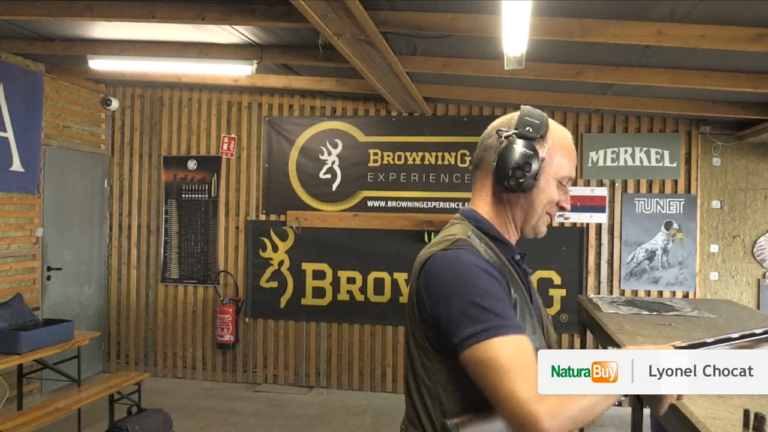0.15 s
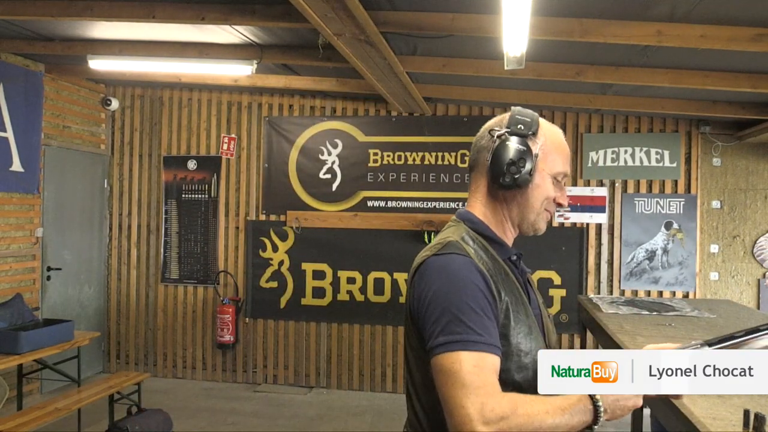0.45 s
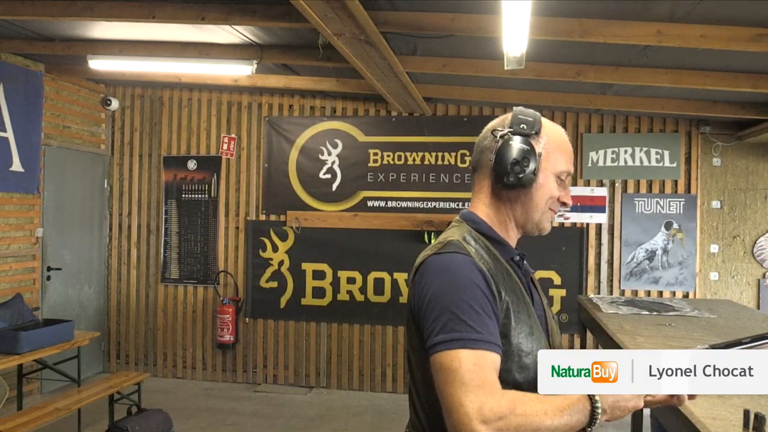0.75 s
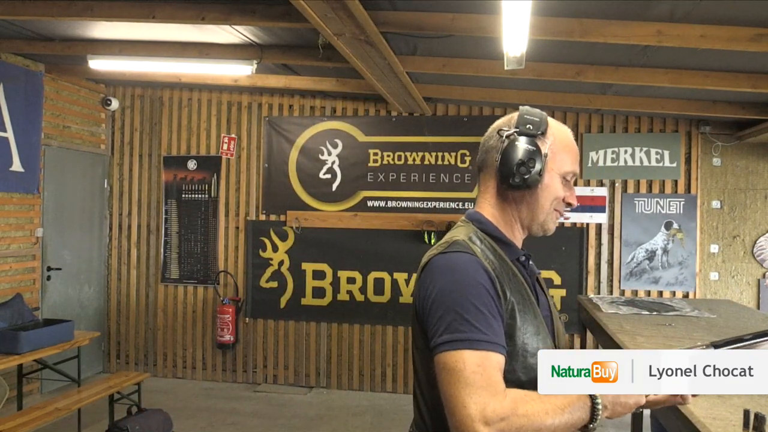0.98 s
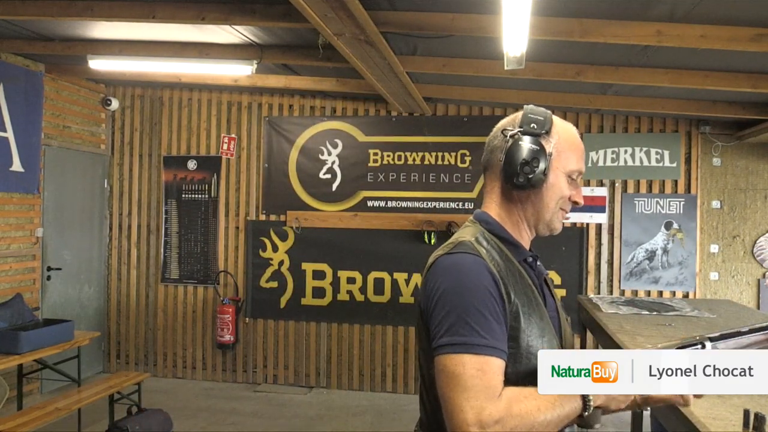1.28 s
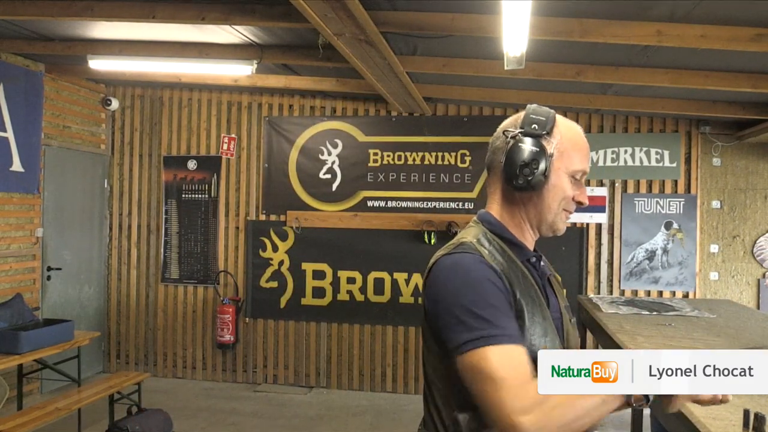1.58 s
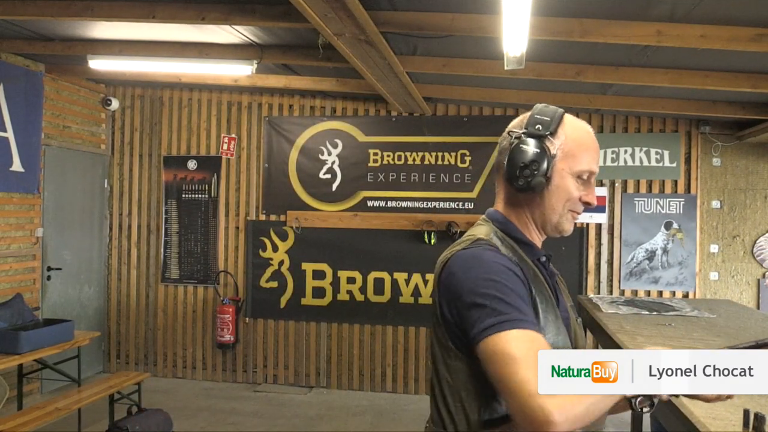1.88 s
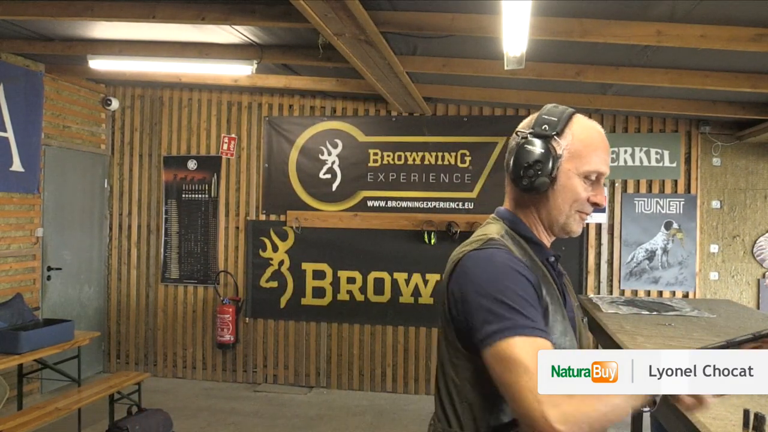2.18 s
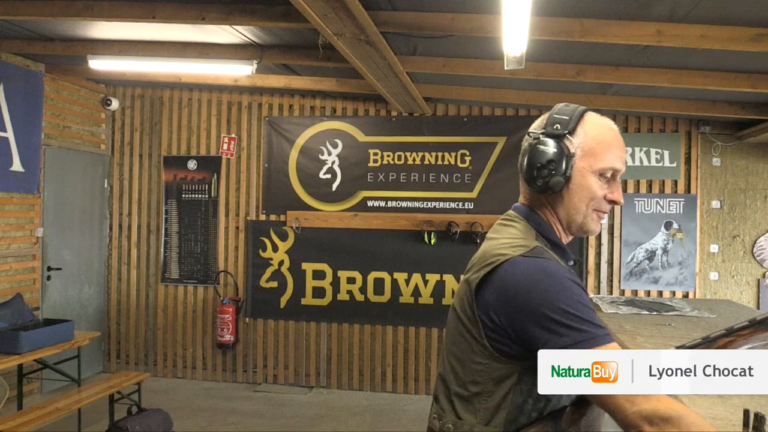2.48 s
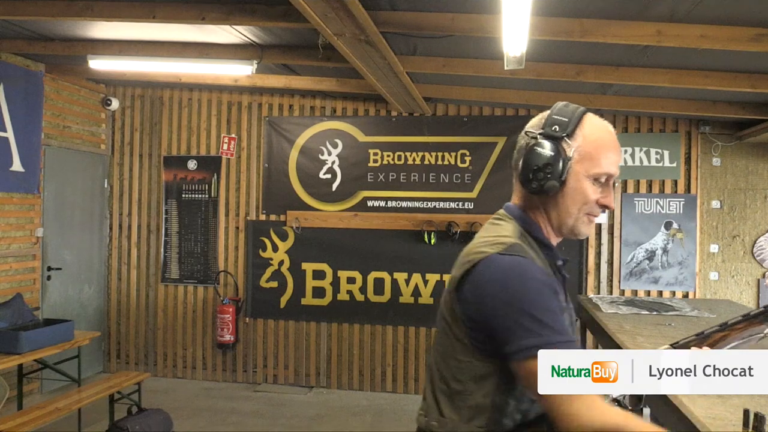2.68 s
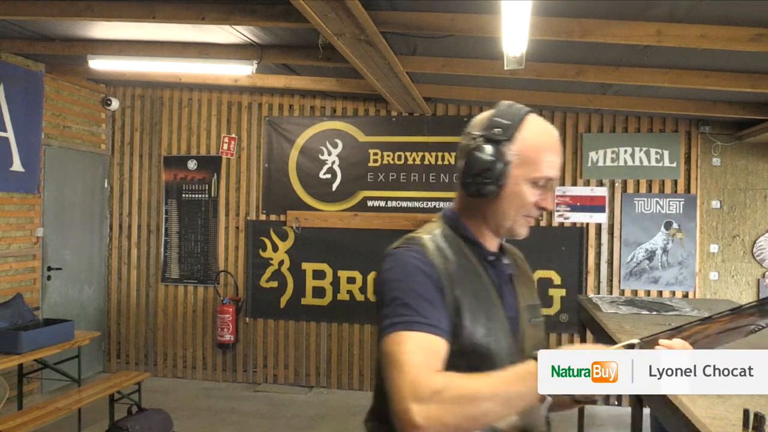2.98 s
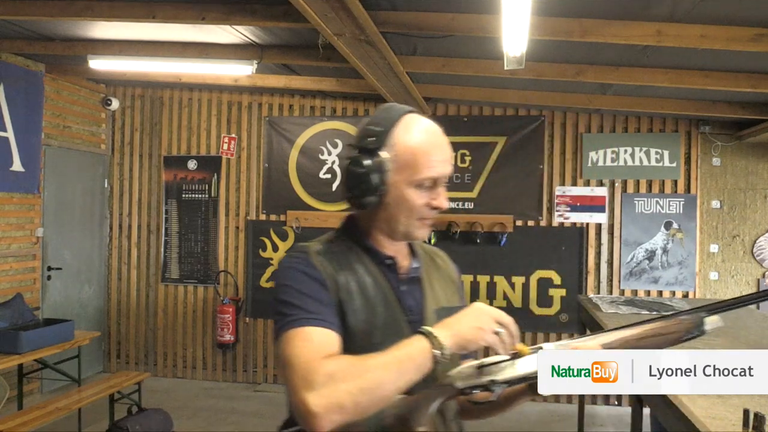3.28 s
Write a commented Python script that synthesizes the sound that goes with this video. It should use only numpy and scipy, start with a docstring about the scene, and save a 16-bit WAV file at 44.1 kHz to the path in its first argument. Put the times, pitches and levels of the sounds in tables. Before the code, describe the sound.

A shotgun action is worked in a wooden indoor range: faint ticks and shell knocks first, then a rapid loud metallic clatter ending in a latch snap, a low thud and small knocks, over quiet ventilation.

```python
"""A shotgun action worked in a wooden indoor range, over uneven ventilation rumble, hiss, faint hums and rustling
clothes. First come small ticks (snaps of band noise) and knocks of hands and shell (noise, pitch, ping, hollow ring).
From 1.85 s a run of steel clacks: chattering contact rings receiver, stock and a bright part; a last latch
ends it at 2.14 s. Then a low thud (resonant noise) with swinging boards (decaying sines), and a few last knocks.
Echoes and a decaying tail answer ticks, knocks and clacks."""
import sys
import numpy as np
from scipy import signal
from scipy.fft import rfft, irfft
from scipy.io import wavfile
from scipy.ndimage import uniform_filter1d

SR = 44100
rng = np.random.default_rng(int(sys.argv[2]) if len(sys.argv) > 2 else 0)


def pcm_store(signal):
    """Save signal as 16-bit PCM."""
    levels = np.round(np.clip(np.atleast_2d(signal), -1, 1) * 32767)
    wavfile.write(sys.argv[1], SR, levels.astype(np.int16).T)


N = 152145


def amp(db):
    """Decibels to amplitude."""
    return 10 ** (np.asarray(db) / 20)


def evened(x):
    """Scale to unit rms."""
    return x / np.sqrt(np.mean(x ** 2) + 1e-20)


def peaked(x):
    """Scale to unit peak."""
    return x / np.max(abs(x))


def read(points, hz):
    """Interpolate a (frequency, value) table over log frequency."""
    f, value = np.transpose(points)
    return np.interp(np.log(hz + 1), np.log(f + 1), value)


def curve(table, column):
    """Interpolate one column of a time table over the whole scene."""
    rows = np.array(table)
    return np.interp(np.arange(N) / SR, rows[:, 0], rows[:, column])


def add(mix, start_s, sound):
    """Mix a sound in at its start time, cut at the end of the scene."""
    part = mix[round(start_s * SR):][:len(sound)]
    part += sound[:len(part)]


def band(x, lo_hz, hi_hz, order=2):
    """Butterworth bandpass."""
    edges = np.clip([lo_hz, hi_hz], 20, .49 * SR)
    return signal.sosfilt(signal.butter(order, edges, "bandpass", fs=SR, output="sos"), x)


def resonate(x, hz, width_hz):
    """Two-pole resonator."""
    r = np.exp(-np.pi * width_hz / SR)
    return signal.lfilter([1 - r], [1, -2 * r * np.cos(2 * np.pi * hz / SR), r * r], x)


def chatter_noise(shape, count=4):
    """Noise under an envelope, spectrum evened out so that no pitch stands out."""
    x = rng.standard_normal(len(shape)) * shape
    for _ in range(count):
        flat = irfft(np.exp(1j * np.angle(rfft(x))), len(x))
        x = np.sign(flat) * shape
    return x


def burst(t60_s, size=4000):
    """Noise that starts at once and dies: the rattle of a contact."""
    t = np.arange(size) / SR
    return chatter_noise(amp(-60 * t / max(t60_s, .002)))


def ring(modes, drive):
    """A drive signal shakes a set of dying sine modes; unit peak."""
    t = np.arange(len(drive)) / SR
    tone = sum(amp(db - 60 * t / t60_s) * np.sin(2 * np.pi * hz * t) for hz, db, t60_s in modes)
    return peaked(signal.fftconvolve(drive, tone)[:len(drive)])


# room bed spectrum, relative: [f/Hz, density/dB per Hz]
BED_SPECTRUM = [(12, -53.5), (20, -10.5), (27, -22.5), (91, 0.5), (107, -14), (123, -22), (216, -25),
                (434, -32), (590, -30), (923, -28.5), (1290, -36), (2990, -41.5), (3840, -38),
                (4300, -48.5), (16000, -47.5)]
# low rumble, randomly uneven: [t/s, rms level/dB]
RUMBLE = [(0.0, -59), (1.13, -54.5), (1.41, -62), (1.53, -57.5), (2.2, -62), (2.36, -65), (2.55, -56.5),
          (3.07, -57), (3.34, -56.5), (3.45, -60)]
# steady hums: [f/Hz, peak level/dB]
HUMS = [(599, -75), (350, -80), (3900, -78)]
# narrow noise whine, one row: [f/Hz, width/Hz, rms level/dB]
WHINE = (3950, 220, -80)
BED_RMS_DB, RUMBLE_EDGE_HZ = -55, 130  # bed level before its low share is relevelled


def air():
    """Low ventilation rumble, randomly uneven in level, steady hiss, hums and a whine: noise, sines, a resonance."""
    hz = np.fft.rfftfreq(N, 1 / SR)
    t = np.arange(N) / SR
    noise = rng.standard_normal(N)
    coloured = irfft(rfft(noise) * amp(read(BED_SPECTRUM, hz)), N)
    bed = amp(BED_RMS_DB) * rfft(evened(coloured))
    low_share = 1 / (1 + (hz / RUMBLE_EDGE_HZ) ** 6)
    rumble = evened(irfft(bed * low_share, N)) * amp(curve(RUMBLE, 1))
    hiss = irfft(bed * (1 - low_share), N)
    hums = sum(amp(db) * np.sin(2 * np.pi * f * t) for f, db in HUMS)
    whine_hz, width_hz, whine_db = WHINE
    whine = amp(whine_db) * evened(resonate(noise[::-1], whine_hz, width_hz))
    return hiss + rumble + hums + whine


# cloth and hands: [t/s, mids rms level/dB, treble rms level/dB]
RUSTLE = [(0, -72, -71), (.05, -80, -82), (.2, -67.5, -69), (.3, -65, -75), (.37, -62.5, -63.5),
          (.44, -66, -63), (.5, -64, -67), (.56, -68.5, -77), (.7, -81, -78), (1.3, -76.5, -77.5),
          (1.4, -63, -86), (1.5, -61.5, -74), (1.53, -63.5, -65), (1.56, -66, -92), (1.75, -68, -66),
          (1.85, -60.5, -76.5), (2.2, -70.5, -84.5), (2.39, -62, -74), (2.425, -59.5, -58),
          (2.46, -60, -95), (2.6, -67, -86), (2.95, -74.5, -73), (3.3, -68, -99), (3.45, -67, -71)]
GRAINS_PER_S = 2200


def rustle():
    """Cloth and hands: noise roughened by dense small grains, mids and treble levelled apart."""
    grains = (rng.random(N) < GRAINS_PER_S / SR).astype(float)
    density = evened(uniform_filter1d(grains, 30))
    rough = rng.standard_normal(N) * (.5 + density)
    mids = evened(band(rough, 470, 3900, order=1)) * amp(curve(RUSTLE, 1))
    treble = evened(band(rough, 3600, 21000, order=1)) * amp(curve(RUSTLE, 2))
    return mids + treble


# thin bright ticks: [t/s, peak level/dB, centre f/Hz, t60/s]
TICKS = [(0.0134, -42, 13000, 0.012), (0.0174, -48.5, 7500, 0.013), (0.0248, -42, 12900, 0.012),
         (0.2404, -40, 14200, 0.01), (0.2544, -48, 5000, 0.009), (0.3277, -41.5, 14800, 0.009),
         (0.3357, -45, 12700, 0.011), (0.3578, -45, 8000, 0.014), (0.3616, -41.5, 6840, 0.009),
         (0.435, -51, 11400, 0.009), (0.46, -44, 10800, 0.009), (0.4754, -39, 12900, 0.009),
         (0.4888, -36, 13400, 0.009), (0.4931, -33.5, 11660, 0.009), (0.5203, -46.5, 13400, 0.012),
         (0.5374, -60, 7300, 0.009), (1.3336, -47, 7300, 0.01), (1.6314, -41, 9270, 0.0098),
         (1.736, -39, 6380, 0.009), (1.7576, -39, 12690, 0.009), (1.7852, -40.5, 13690, 0.009),
         (1.7968, -39, 13380, 0.0097), (1.8034, -41, 13130, 0.009), (1.8094, -49.5, 13700, 0.009),
         (1.8469, -43, 7530, 0.011), (2.033, -20.5, 4500, 0.012), (2.4962, -57, 6100, 0.009),
         (3.4394, -57, 8210, 0.009)]
TICK_BAND_RATIO = 2.1  # centre to either band edge


def tick(db, hz, t60_s):
    """A tiny bright snap: one band of a dying noise burst."""
    snap = band(burst(t60_s, size=1500), hz / TICK_BAND_RATIO, hz * TICK_BAND_RATIO)
    return amp(db) * peaked(snap)


# early tail decay: [f/Hz, t60/s]
ROOM_DECAY = [(150, 0.39), (700, .3), (2000, 0.21), (4000, 0.26), (8000, .27), (15000, 0.27)]
# tail colour, relative: [f/Hz, level/dB]
ROOM_COLOUR = [(150, -14), (500, -12.5), (1200, -1), (2000, -3), (4500, -1), (8000, -2.5), (15000, -7)]
# single echoes, before their bandpass: [delay/s, level/dB]
ECHOES = [(.0092, -10), (0.019, -13)]
TAIL_DB = -10  # energy of the whole tail
LATE_DB, LATE_T60_S, LATE_HZ = -29, 1.2, 4000  # long tail: level re early tail, decay, treble edge


def room(x):
    """A few single echoes, then sparse taps that die band by band, with a faint long tail."""
    taps = np.zeros(SR)
    at = np.arange(200, SR - 20, 12)
    taps[at + rng.integers(0, 12, len(at))] = rng.choice([-1., 1.], len(at))
    hz, t, spectra = signal.stft(taps, SR, nperseg=256)
    early = amp(-60 * t / read(ROOM_DECAY, hz)[:, None])
    late = amp(LATE_DB - 60 * t / LATE_T60_S) / (1 + (hz[:, None] / LATE_HZ) ** 4)
    colour = amp(read(ROOM_COLOUR, hz))[:, None]
    tail = signal.istft(spectra * (early + late) * colour, SR, nperseg=256)[1]
    tail = amp(TAIL_DB) * tail / np.linalg.norm(tail)
    echoes = np.zeros(len(tail))
    for delay_s, db in ECHOES:
        echoes[round(delay_s * SR)] = amp(db)
    return signal.fftconvolve(x, tail + band(echoes, 300, 5000, order=1))[:N]


# knocks of shell and fingers: [t/s, peak level/dB, pitch f/Hz, treble/dB, hollow ring/dB, noise t60/s]
KNOCKS = [(0.183, -51.5, 1990, -16, 11, 0.032), (0.227, -35, 1850, 3.5, -5, 0.027),
          (0.378, -45.5, 1710, 4, -1.5, 0.044), (0.657, -53.5, 3900, -5, -7, 0.048),
          (1.07, -56, 2730, -15, -2, 0.024), (1.118, -53.5, 3900, -17, -12, 0.051),
          (1.333, -48, 2160, -13, -4, 0.014), (1.511, -40.5, 3950, -13, -12, 0.031),
          (3.022, -45, 2622, -12, 6.5, 0.03), (3.173, -52.5, 3473, -0.5, -2, 0.026),
          (3.2843, -30.5, 2120, -6, -2, 0.012), (3.315, -34, 2100, -7.5, 4.5, 0.017),
          (3.331, -45, 2157, -10, 0, 0.019), (3.404, -46.5, 1840, -12, 4.5, 0.019)]
# hollow stock modes, relative, shared with the clacks: [f/Hz, level/dB, t60/s]
HOLLOW = [(686, -1.5, 0.08), (903, -2.5, 0.03), (1030, 1.5, 0.026), (497, -16.5, 0.071)]
KNOCK_BAND_RATIO, PING_HZ = 1.5, 4500


def knock(db, hz, treble_db, hollow_db, t60_s):
    """A short blow with its own pitch, a brass ping and a hollow ring."""
    rattle, blow = burst(t60_s), burst(.004)
    ping = ring([(PING_HZ, 0, .006)], blow) + 0.75 * peaked(band(rattle, 2500, 11000))
    pitch = 0.65 * ring([(hz, 0, t60_s / 2)], blow)
    body = peaked(band(rattle, hz / KNOCK_BAND_RATIO, hz * KNOCK_BAND_RATIO))
    hollow = amp(hollow_db) * ring(HOLLOW, blow)
    return amp(db) * peaked(pitch + body + amp(treble_db) * ping + hollow)


# steel on steel: [t/s, peak level before filter and limiter/dB, receiver ring/dB, treble/dB, bass/dB
# (also the hollow ring), bright ring f/Hz, bright ring/dB, chatter/s]
CLACKS = [(1.848, -31, 6, -15.5, -0.5, 11500, -18, 0.0043),
          (1.874, -30.5, -5.5, -32.5, -12.5, 4200, -10.5, 0.012),
          (1.8848, -14, -0.5, -13.5, -15, 6960, -6.5, .002),
          (1.889, -16.5, -4.5, -13, -10, 4550, -16, 0.00089),
          (1.893, -16, 1, -16.5, -16, 5260, -9.5, 0.0027), (1.8968, -15, -4, -13, -7, 7530, -6, 0.001),
          (1.9093, -21, -5, -16.5, -16.5, 7440, -9.5, 0.003), (1.9158, -15, -2, -18, -19, 7600, -6, 0.0028),
          (1.9246, -8.5, -6.5, -10.5, -20.5, 6180, -4.5, 0.0018),
          (1.9375, -10, -7, 0.5, -17, 5570, -1.5, 0.0017),
          (1.9441, -14.5, -6.5, -10, -24.5, 14670, -6.5, 0.0026),
          (1.9483, -3, -5.5, -2.5, -30, 10400, 2.5, .001), (1.9486, -4, -7.5, -1.5, -30, 7820, 1, .001),
          (1.9495, -13, -5.5, -20.5, -21.5, 2240, 7, 0.0046), (1.984, 2, -3.5, -5.5, -21, 8020, -7.5, .004),
          (1.990, -2, -5, -13.5, -23, 10810, -15, 0.0021),
          (2.002, -5, -9.5, -13.5, -24, 11600, -8.5, 0.0013),
          (2.1407, -8, -2, -44, -16.5, 4130, -2, 0.00034), (2.1424, -7.5, -4, -4, -18.5, 10360, -4, .001)]
# receiver modes, relative: [f/Hz, level/dB, t60/s]
STEEL = [(458, -30.5, .5), (1297, -2, 0.057), (1930, 16.5, 0.015), (2194, 6, 0.044), (2430, 5, 0.022),
         (2790, 4, 0.029), (3140, -10, 0.071), (3704, 5.5, .03), (4106, -3, 0.09), (5500, -18, 0.031)]
CRACK_HZ, TREBLE_HZ, BASS_HZ = (1276, 5870), (5000, 13000), (650, 1447)
RISE_S, RELEASE_T60_S = .0004, 0.01
BRIGHT_T60_S, BRIGHT_SLOPE = .0035, 1.4  # t60 at 10 kHz; lower parts ring longer
RING_SEND_DB = -4


def clack(db, steel_db, treble_db, bass_db, ring_hz, ring_db, chatter_s):
    """Chattering contact cracks and rings receiver, hollow stock and one bright part; returns (direct, room send).
    The room gets the broad crack as one smooth click, less of the rings and none of the bright part."""
    t = np.arange(8000) / SR
    rise = np.minimum(t / RISE_S, 1)
    drive = chatter_noise(rise * amp(-60 * np.maximum(t - chatter_s, 0) / RELEASE_T60_S))
    steel = sum(amp(mode_db - 60 * t / t60_s) * np.sin(2 * np.pi * (hz * t + rng.random()))
                for hz, mode_db, t60_s in STEEL)
    rings = amp(steel_db) * peaked(steel * rise) + amp(bass_db) * ring(HOLLOW, drive)
    bright_t60_s = BRIGHT_T60_S * (10000 / ring_hz) ** BRIGHT_SLOPE
    bright = amp(ring_db) * ring([(ring_hz, 0, bright_t60_s)], drive)
    impulse = 1. * (t == 0)
    crack, click = np.zeros(len(t)), np.zeros(len(t))
    for level_db, edges_hz in ((0, CRACK_HZ), (treble_db, TREBLE_HZ), (bass_db, BASS_HZ)):
        part = amp(level_db) * peaked(band(drive, *edges_hz))
        smooth = band(impulse, *edges_hz)
        crack += part
        click += smooth * np.linalg.norm(part) / np.linalg.norm(smooth)  # same energy per band
    direct = crack + rings + bright
    gain = amp(db) / np.max(abs(direct))
    return gain * direct, gain * (click + amp(RING_SEND_DB) * rings)


# rumble of floor and bench: [t/s, level/dB]
THUD = [(2.17, -47), (2.188, -32.5), (2.308, -45.5), (2.314, -45), (2.416, -54.5), (2.44, -53),
        (2.462, -61), (2.6, -60)]
# broad resonances, relative: [f/Hz, width/Hz, level/dB]
THUD_MODES = [(101, 72, 0.5), (189.3, 30, -8.5), (289, 52, -5.5), (485, 59, -14), (810, 1100, -7),
              (1460, 1800, -16.5)]


def thud():
    """A low wooden rumble: floor and bench boom in a few broad resonances of noise."""
    noise = rng.standard_normal(N)
    boom = sum(amp(db) * evened(resonate(noise, hz, width_hz)) for hz, width_hz, db in THUD_MODES)
    t = np.arange(N) / SR
    fade_in = np.clip((t - THUD[0][0]) / 0.015, 0, 1)
    fade_out = np.clip((THUD[-1][0] + 0.092 - t) / 0.22, 0, 1)
    return evened(band(boom, 110.0, 6000)) * amp(curve(THUD, 1)) * fade_in * fade_out


# low bumps: [t/s, level before the soft onset/dB, f/Hz, t60/s]
BUMPS = [(2.184, -28.5, 101, 0.27), (2.205, -37, 93, 0.39), (2.249, -27, 73, 0.12), (2.36, -31.5, 86, 0.15),
         (2.411, -36, 108.5, 0.22)]


def bump(db, hz, t60_s):
    """A soft low swing of the boards: a decaying sine with a one-cycle onset."""
    t = np.arange(SR // 2) / SR
    onset = 1 - np.exp(-t * hz)
    return amp(db - 60 * t / t60_s) * np.sin(2 * np.pi * hz * t) * onset


HANDS_SEND_DB = -4  # ticks and knocks into the room


def scene():
    """Sum the direct hits, their room, the lows, cloth and air."""
    hits, lows = np.zeros(N), thud()
    for table, sound in ((TICKS, tick), (KNOCKS, knock)):
        for start_s, *settings in table:
            add(hits, start_s, sound(*settings))
    to_room = hits * amp(HANDS_SEND_DB)
    for start_s, *settings in CLACKS:
        direct, send = clack(*settings)
        add(hits, start_s, band(direct, 100, SR / 2, order=1))
        add(to_room, start_s, send)
    for start_s, *settings in BUMPS:
        add(lows, start_s, bump(*settings))
    return (hits + room(to_room) + lows + rustle() + air())[None]


LIMIT, EDGE_HZ = .56, 15900  # soft clip ceiling (full scale 1), lowpass edge


def record(dry):
    """Tanh soft clipping of the loudest peaks, then a linear-phase lowpass."""
    soft = LIMIT * np.tanh(dry / LIMIT)
    lowpass = signal.firwin(301, EDGE_HZ, window=("kaiser", 7), fs=SR)
    return signal.oaconvolve(soft, lowpass[None], "same")


dry = scene()
out = record(dry)
pcm_store(out)
```